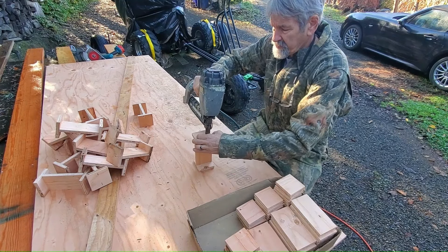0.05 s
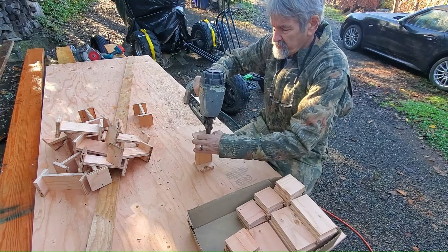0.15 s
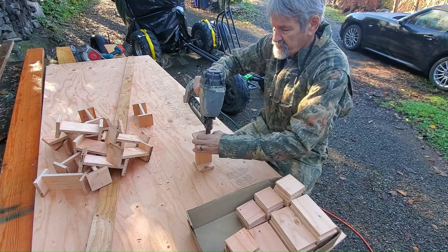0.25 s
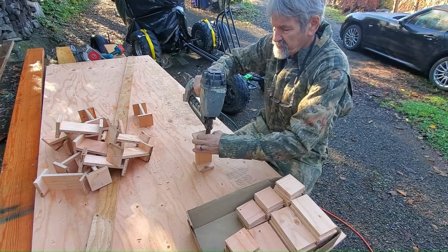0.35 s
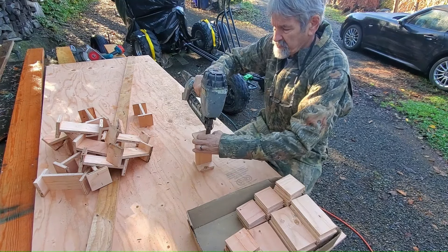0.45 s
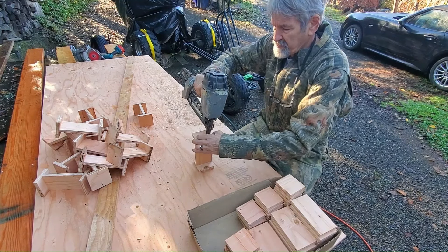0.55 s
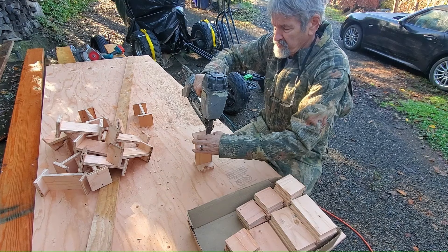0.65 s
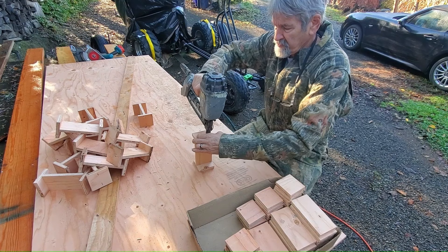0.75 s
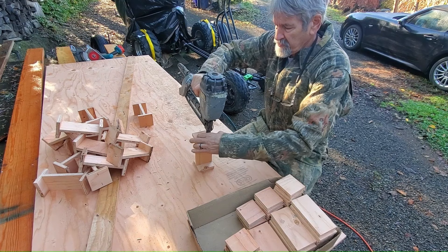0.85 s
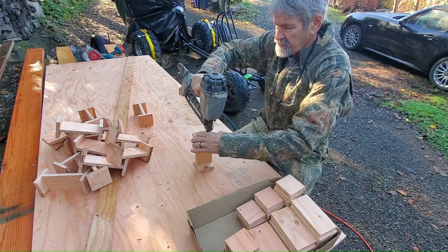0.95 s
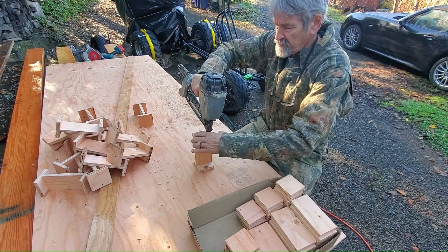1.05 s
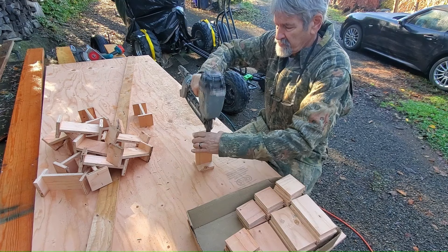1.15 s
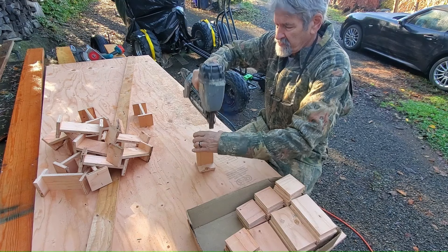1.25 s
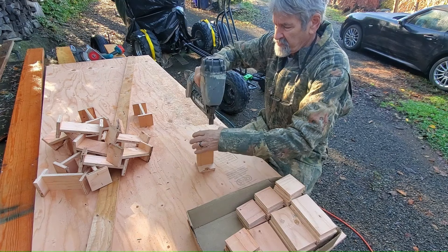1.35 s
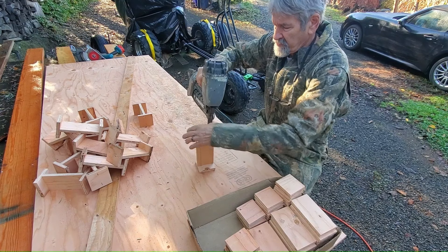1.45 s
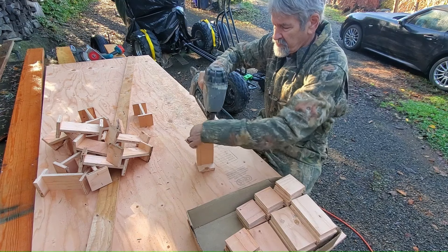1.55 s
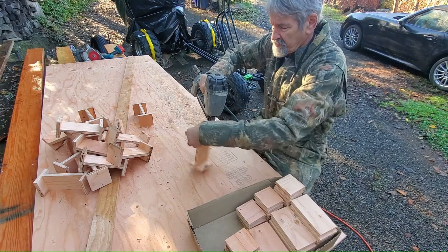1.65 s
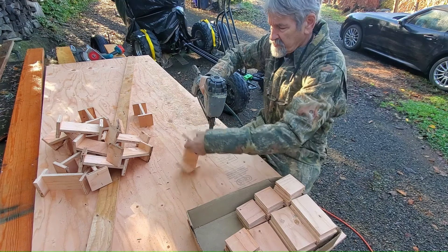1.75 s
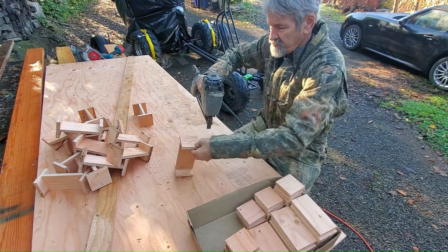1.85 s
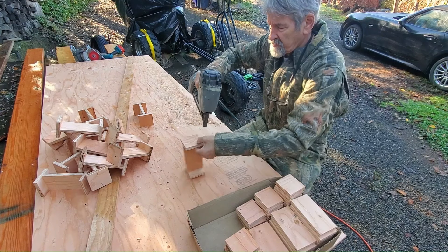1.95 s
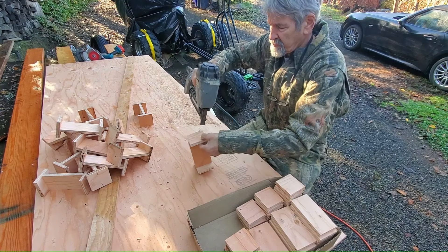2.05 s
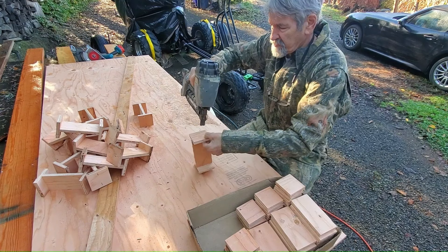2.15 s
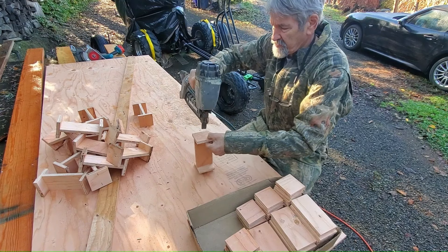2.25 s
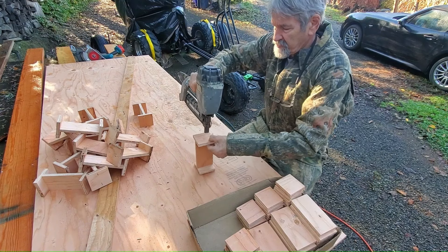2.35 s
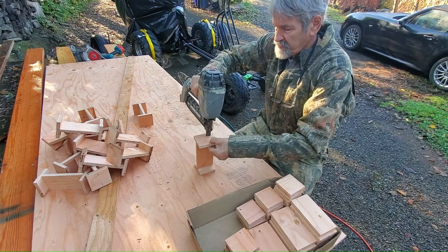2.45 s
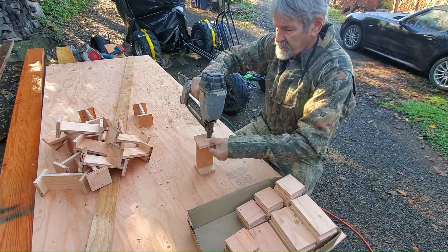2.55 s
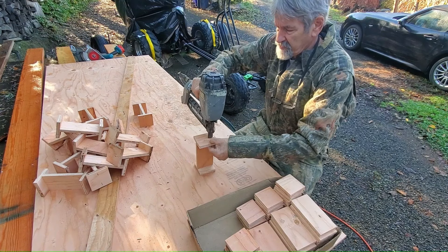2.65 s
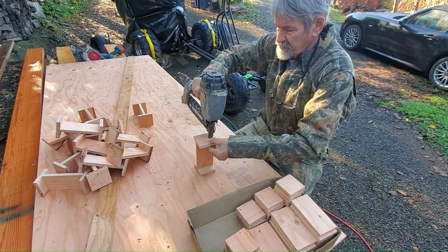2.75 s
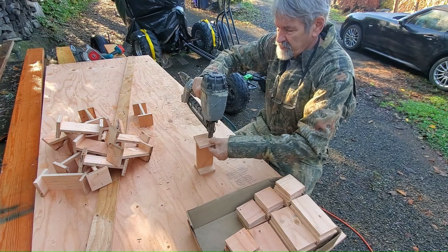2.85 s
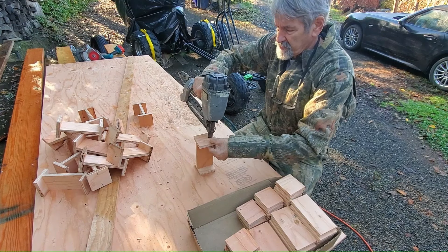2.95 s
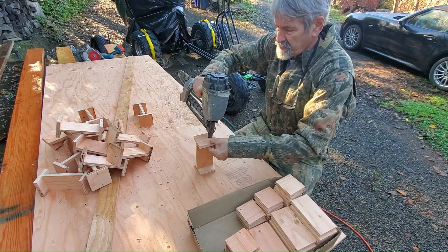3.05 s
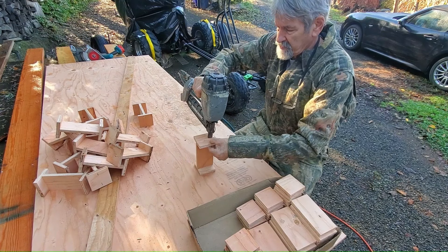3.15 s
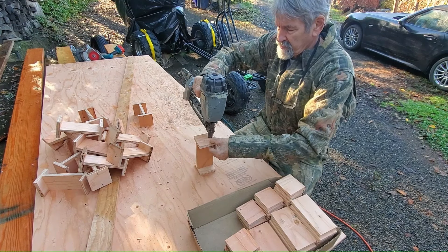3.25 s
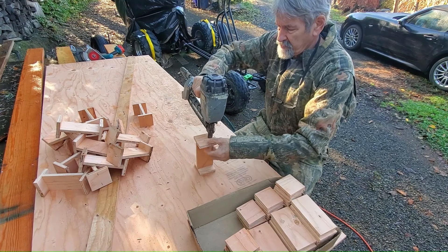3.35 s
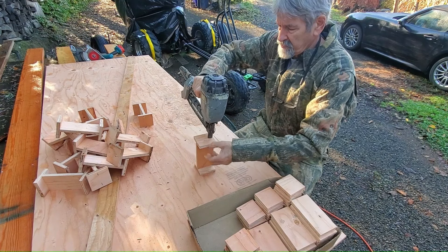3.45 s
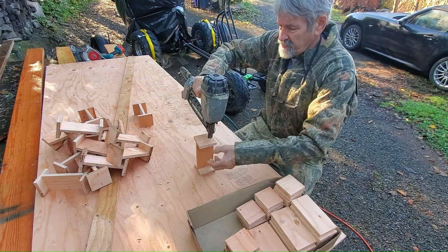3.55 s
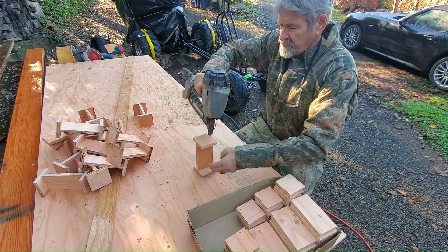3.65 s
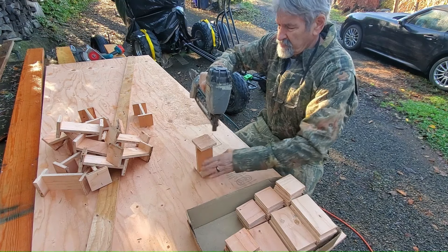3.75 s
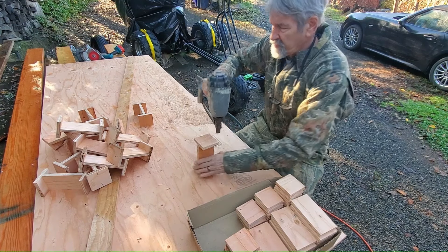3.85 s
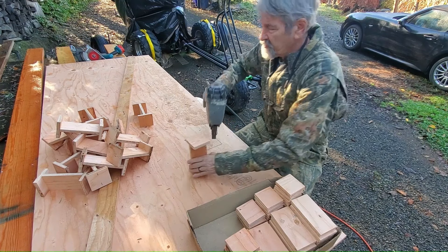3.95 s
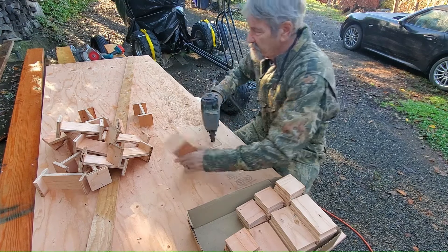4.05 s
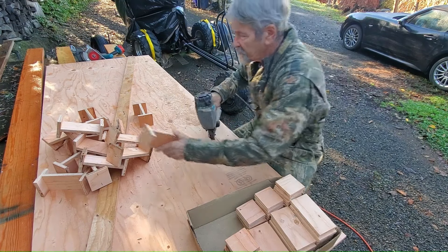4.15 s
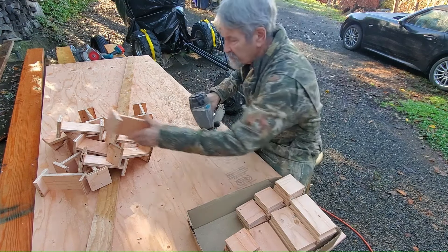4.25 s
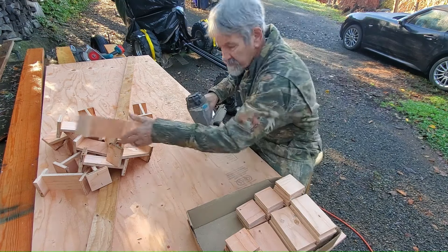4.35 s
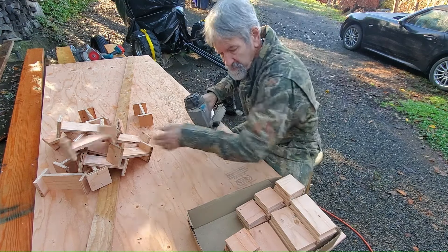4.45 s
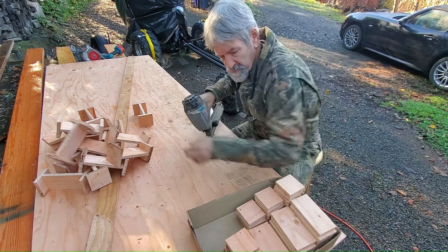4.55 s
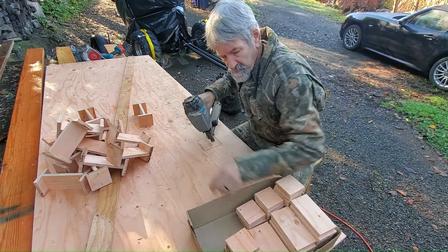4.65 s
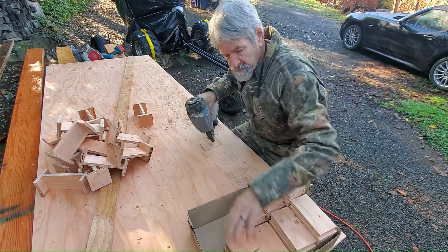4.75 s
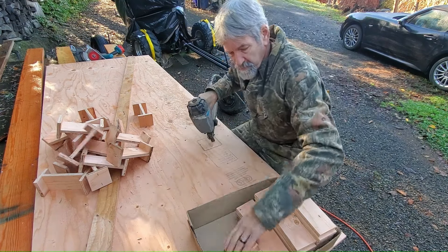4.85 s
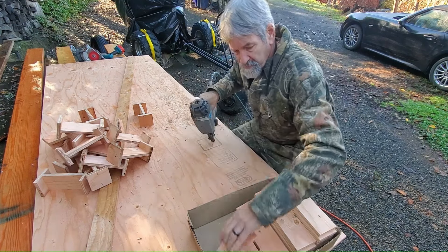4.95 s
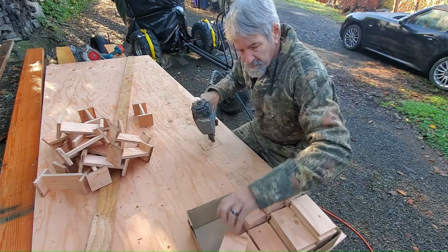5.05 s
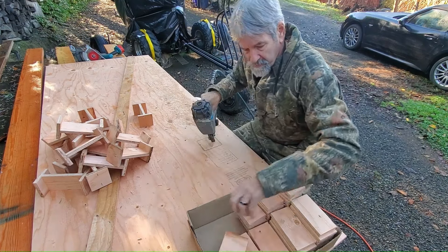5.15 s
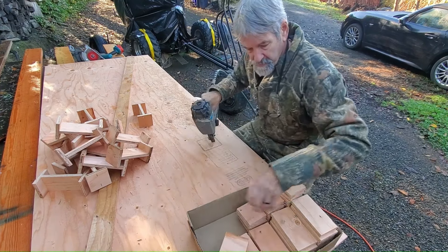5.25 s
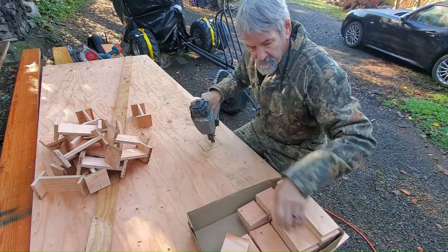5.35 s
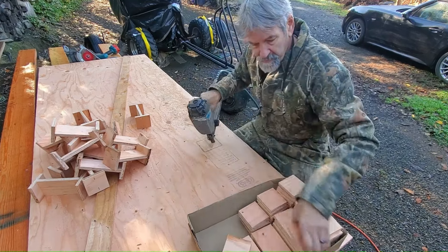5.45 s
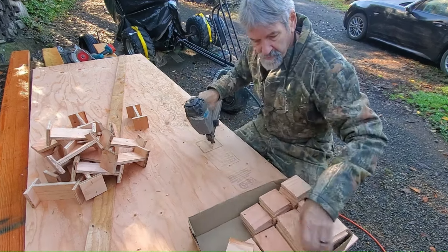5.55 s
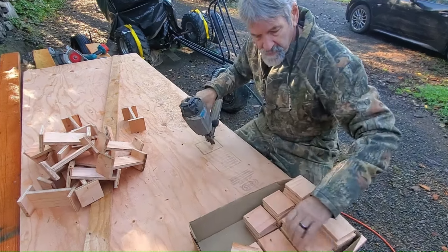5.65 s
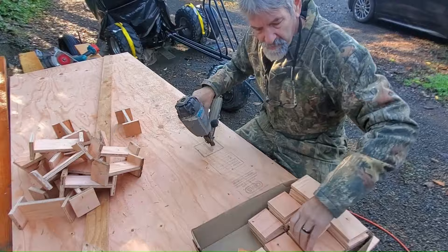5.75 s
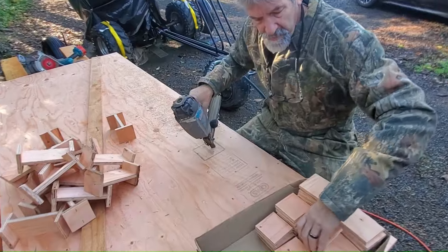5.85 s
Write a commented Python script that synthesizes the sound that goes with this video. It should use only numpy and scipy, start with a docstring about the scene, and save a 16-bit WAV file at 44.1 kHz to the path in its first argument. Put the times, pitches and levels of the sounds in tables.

```python
"""A pneumatic nailer fires twice into a wooden block on a plywood table, outdoors, close to a stereo mic.
Each time air rushes in, the driver strikes, the table booms, the exhaust vents and the yard answers.
The block is turned, set down and tossed on a pile of offcuts to the left; then a sleeve drags over
a box and a block rasps on its cardboard. The hose coupling leaks faintly on the left.
A low, distant rumble sinks after each shot and comes back."""
import sys
import numpy as np
from scipy import signal
from scipy.fft import rfft, irfft, next_fast_len
from scipy.io import wavfile
from scipy.ndimage import uniform_filter1d, map_coordinates

SR = 44100
rng = np.random.default_rng(int(sys.argv[2]) if len(sys.argv) > 2 else 0)


def generate_wav(signal):
    """Clip the signal to [-1, 1] and save it as 16-bit WAV at the path in sys.argv[1]."""
    frames = np.transpose(np.atleast_2d(signal))
    scaled = np.clip(frames, -1, 1) * 32767
    pcm = np.round(scaled).astype(np.int16)
    wavfile.write(sys.argv[1], SR, pcm)


N = 260322
T = np.arange(SR // 2) / SR  # time axis of one short event, s

# how alike the two mic channels are, for three kinds of noise: frequency_hz, correlation
NEAR_IMAGE = [(100, 1), (400, 0.52), (1400, 0.33), (5000, 0.34), (15000, 0.23)]
FAR_IMAGE = [(60, 1), (250, 0.96), (700, 0.074), (1500, 0.0027), (15000, 0.93)]
DIFFUSE_IMAGE = [(100, 1), (400, .5), (1200, 0.3), (15000, 0.6)]
# the plywood sheet flexing as a whole: pitch_hz, level_db, t60_s
SHEET_MODES = [(77, -14.5, 0.16), (87.3, 0.5, 0.22), (123, -7.5, 0.34), (170, -0.5, 0.067),
               (206, -4, 0.068)]
# one row a nail: pull_s, hit_s, release_s, valve_db, burst_db, trail_db, rebound_db, loss_per_bounce_db
NAIL_SHOTS = [(1.2098, 1.2607, 1.338, -13.5, -8, -37, -13, 13.5),
              (3.640, 3.678, 3.797, -13, -8, -29, -19.5, 2)]


def amp(db):
    """Decibels to gain."""
    return 10 ** (np.asarray(db) / 20)


def unit(x):
    """Scale to rms 1."""
    return x / np.sqrt(np.mean(x ** 2) + 1e-20)


def peaked(x):
    """Scale to peak 1."""
    return x / np.abs(x).max()


def along(points, hz):
    """Interpolate (frequency_hz, value) points on a log frequency axis."""
    freqs, values = np.transpose(points)
    return np.interp(np.log(hz + 1), np.log(freqs), values)


def wobble(rate):
    """A smooth random curve, rate knots a second."""
    knots = rng.standard_normal(int(N * rate / SR) + 4)
    return map_coordinates(knots, [np.arange(N) * rate / SR])


def filtered(x, response):
    """Filter x by a gain that is a function of frequency."""
    n = x.shape[-1]
    padded = next_fast_len(n + SR // 10)
    return irfft(rfft(x, padded) * response(np.fft.rfftfreq(padded, 1 / SR)), padded)[..., :n]


def noise(spectrum, image, size=len(T)):
    """Stereo noise of rms 1, coloured by (frequency_hz, level_db) points."""
    def mid_side_gains(hz):
        angle = np.arccos(np.clip(along(image, hz), -1, 1)) / 2
        return amp(along(spectrum, hz)) * [np.cos(angle), np.sin(angle)]
    mid, side = filtered(rng.standard_normal((2, size)), mid_side_gains)
    return unit(np.array([mid + side, mid - side]))


def patchy(x, depth_db):
    """The colour shifts at random, in patches about 500 Hz wide and 60 ms long."""
    bins = signal.stft(x, nperseg=512)[2]
    patches = uniform_filter1d(rng.standard_normal(bins.shape[1:]), size=6, axis=0)
    patches = uniform_filter1d(patches, size=10, axis=1)
    return unit(signal.istft(bins * amp(depth_db * unit(patches)), nperseg=512)[1][:, :N])


def fade(t60, rise):
    """A quick rise and an exponential decay, both in seconds."""
    return amp(-60 * T / t60) * (1 - np.exp(-T / rise))


def swells(strokes):
    """Each stroke rises and falls smoothly about its centre."""
    t = np.arange(N) / SR
    return sum(amp(db) * np.exp(-((t - s) / half) ** 2) for s, db, half in strokes)


def ping(hz, t60):
    """One damped resonance of peak 1."""
    return peaked(fade(t60, rise=0.00023) * np.sin(2 * np.pi * hz * T))


def ring(modes, scatter_db, spread):
    """Damped modes, new in strength at each blow; a wide radiator reaches the channels out of step."""
    out = np.zeros((2, len(T)))
    for k, (hz, db, t60) in enumerate(modes):
        strength, skew = rng.standard_normal(2)
        phase = 2 * np.pi * hz * T + spread * skew * np.array([[1], [-1]])
        out += (-1) ** k * amp(db + scatter_db * strength) * fade(t60, rise=0.0004) * np.sin(phase)
    return out


def add(track, s, sound):
    """Mix a sound in at time s."""
    i = round(s * SR)
    track[:, i:i + sound.shape[-1]] += sound[..., :N - i]


def from_left(x, lead_s):
    """A source to the left reaches that side of the mic first."""
    return filtered(x, lambda hz: np.exp(1j * np.pi * hz * lead_s * np.array([[1], [-1]])))


def leftward(db):
    """Gains that raise the left channel and lower the right."""
    return amp([[db], [-db]])


def hiss():
    """A faint steady hiss under everything."""
    return amp(-89.5) * noise([(100, 0.5), (3000, -9.5), (15000, -7.0)], FAR_IMAGE, size=N)


def dip(sink_stretch=1, return_stretch=1):
    """A gain that sinks after each shot, stays low, then returns."""
    # the dips in level: start_s, sink_time_s, depth_db, return_start_s, return_time_s
    dips = [(1.33, 0.13, 28.5, 2.54, 0.38), (3.83, 0.14, 29, 4.878, 0.003)]
    t = np.arange(N) / SR
    loss_db = 0
    for start_s, sink_s, depth_db, return_start_s, return_s in dips:
        sinking = 1 - np.exp(-np.maximum(t - start_s, 0) / (sink_s * sink_stretch))
        held = np.exp(-np.maximum(t - return_start_s, 0) / (return_s * return_stretch))
        loss_db += depth_db * sinking * held
    return amp(-loss_db)


def background():
    """Outdoor rumble and a distant rush whose colour drifts."""
    # the two spectra: frequency_hz, level_db
    rumble_spectrum = [(13, -39), (22, -14.5), (44, -2.5), (64, 3.5), (151, -6), (183, -14.5), (246, -24.5),
                       (300, -20), (390, -46), (660, -120)]
    rush_spectrum = [(130, -34.5), (200, -6), (250, -8.5), (351, -3.5), (405, -6.5), (480, -2.5), (732, 0),
                     (1200, -8.5), (1700, -19.5), (2200, -30), (3000, -37), (7500, -42), (16000, -44)]
    # likeness of the channels in the open air: frequency_hz, correlation
    wide_image = [(60, 0.93), (150, 1), (380, 0.43), (950, -0.37), (2380, 0.65), (15000, 1)]
    rumble = amp(-45.5 + 1.2 * wobble(14)) * noise(rumble_spectrum, wide_image, size=N)
    rush_gain = amp(-50.5 + 0.28 * wobble(26))
    rush = patchy(noise(rush_spectrum, wide_image, size=N), depth_db=2.0)
    return rumble + rush_gain * rush


def yard(x):
    """The diffuse answer of trees and ground; each frequency dies at its own speed."""
    # the yard's decay: frequency_hz, t60_s
    decay = [(100, 0.63), (600, 0.18), (2000, 0.23), (5000, 0.32), (15000, 0.18)]
    colour = [(150, -28.0), (700, -13.5), (2500, -9.5), (6000, -14), (10000, -11.5), (15000, -13.5)]
    hz, t, bins = signal.stft(rng.standard_normal((2, SR * 3 // 4)), SR, nperseg=256)
    tail = signal.istft(bins * amp(-60 * t / along(decay, hz)[:, None]), SR, nperseg=256)[1]
    tail *= 1 - np.exp(-np.arange(tail.shape[1]) / SR / .05)  # echoes build over 50 ms
    wet = signal.fftconvolve(x, tail / np.linalg.norm(tail[0]), axes=1)[:, :N]
    return filtered(wet, lambda hz: amp(along(colour, hz)))


def whistle(hz):
    """A faint, broken whistle of escaping air."""
    # when it sounds: centre_s, level_db, half_length_s
    whistles = [(.15, -82, .2), (.52, -76, .13), (1.04, -78, .13), (1.476, -51, .011), (3.08, -75, .04),
                (3.18, -79, .035), (3.32, -82, .06)]
    pitch = hz * (1 + .007 * wobble(80))
    return swells(whistles) * amp(2.5 * wobble(45)) * np.sin(2 * np.pi * np.cumsum(pitch) / SR)


def leak():
    """Air hisses from the hose coupling, left of the mic, and now and then whistles."""
    # the leaking air: frequency_hz, level_db
    leak_spectrum = [(1800, -30), (2600, -7), (3200, -9), (3850, -4), (4600, -13), (5300, 0), (6100, -7),
                     (6750, -2), (7400, -22), (16000, -32)]
    air = amp(-75 + wobble(6.1)) * noise(leak_spectrum, DIFFUSE_IMAGE, size=N)
    return leftward(db=3) * (dip(sink_stretch=2, return_stretch=.5) * air + whistle(hz=2635))


def sleeve():
    """Cloth rubs unevenly across the box; dragging on the rim, its hiss narrows and sinks in pitch."""
    # rubbing cloth: frequency_hz, level_db
    cloth_spectrum = [(710, -38), (1200, -6), (2250, -8.5), (2560, -12), (4260, -4), (4650, -8.5),
                      (6370, -10.5), (8000, -17.5), (14700, -18.5), (16000, -27)]
    # strokes over the box and on its rim: centre_s, level_db, half_length_s
    brushes = [(4.92, -62, 0.061), (5.04, -58.5, 0.13), (5.3, -70, 0.079), (5.5, -59, 0.12),
               (5.71, -60, 0.044), (5.86, -61, 0.071)]
    drags = [(5.065, -62, 0.054), (5.2, -66, .1)]
    # centre of the narrow hiss: time_s, pitch_hz
    drag_pitch = [(5.07, 4400), (5.16, 4190), (5.3, 4030)]
    width_hz = 550
    brush_gain = swells(brushes) * amp(1.55 * wobble(67))
    cloth = patchy(noise(cloth_spectrum, DIFFUSE_IMAGE, size=N), depth_db=2.5)
    pitch = np.interp(np.arange(N) / SR, *np.transpose(drag_pitch))
    phase = 2 * np.pi * np.cumsum(pitch) / SR
    band = [wobble(width_hz) * np.sin(phase) + wobble(width_hz) * np.cos(phase) for _ in range(2)]
    return brush_gain * cloth + swells(drags) * amp(1.9 * wobble(40)) * unit(np.array(band))


def rasp():
    """Wood slips on cardboard at a nearly even rate; the slips and the grit between ring the box wall."""
    # the block's strokes: centre_s, level_db, half_length_s
    strokes = [(5.815, -48, 0.02), (5.854, -45.5, 0.022), (5.897, -43.5, 0.022)]
    # resonances of the cardboard: pitch_hz, width_hz, level_db
    wall_modes = [(410, 150, -0.5), (1150, 105, -4.5), (1594, 89, 2.5), (2160, 95, 0.5), (2790, 68, -3),
                  (3780, 54, -10)]
    slip_hz, slip_t60, grit_db = 140, 0.039, 7

    def wall(f):
        return sum((-1) ** k * amp(db) * 1j * f * width / (hz * hz - f * f + 1j * f * width)
                   for k, (hz, width, db) in enumerate(wall_modes))
    slip_count = np.cumsum(slip_hz * amp(0.15 * wobble(60))) / SR
    snaps = np.diff(np.floor(slip_count), prepend=0) * amp(3.4 * wobble(110))
    since_slip_s = (slip_count % 1) / slip_hz
    grit = amp(-60 * since_slip_s / slip_t60) * noise([(300, 0.0049), (6000, 0)], NEAR_IMAGE, size=N)
    return swells(strokes) * unit(filtered(unit(snaps) + amp(grit_db) * unit(grit), wall))


def rubs():
    """Friction catches and slips: a block in the box, the cuff on an edge, the nailer's nose on wood."""
    # strokes of each: centre_s, level_db, half_length_s
    block_slides = [(5.412, -59, .007), (5.44, -57, .016), (5.505, -49.5, 0.031)]
    cuff_skims = [(5.03, -68, 0.13), (5.603, -54.5, 0.026)]
    nose_ticks = [(.332, -65.5, 0.0056), (3.48, -56.5, 0.0037)]
    # spectrum of each: frequency_hz, level_db
    slide_spectrum = [(590, -32), (1000, -3), (2270, -2), (2600, -7), (4160, -9.5), (4560, -18),
                      (6170, -19), (9000, -27), (11700, -54), (19800, -120)]
    skim_spectrum = [(6000, -9), (10000, -9.5), (13500, 0), (16000, -5.5)]
    tick_spectrum = [(1500, -9), (3000, -9), (6500, -1), (9000, -7.5), (15000, -18)]

    def rub(strokes, spectrum, catch_db):
        return swells(strokes) * unit(amp(catch_db * wobble(250)) * noise(spectrum, NEAR_IMAGE, size=N))
    return (rub(block_slides, slide_spectrum, catch_db=2.5)
            + rub(cuff_skims, skim_spectrum, catch_db=0.5)
            + rub(nose_ticks, tick_spectrum, catch_db=-1.0))


def clack(db, corner_hz):
    """A sharp tick and a small block's ring, dulled above corner_hz; the table thumps beneath."""
    # an offcut on the pile: pitch_hz, level_db, t60_s
    offcut_modes = [(381, -4, 0.12), (473, 4.5, 0.042), (580, -0.5, 0.057), (848, -7, 0.059),
                    (891, -15.5, 0.093), (1160, -2.5, 0.057), (1420, 3, 0.04), (1570, -13, 0.088),
                    (1870, -10, 0.077), (2580, -6, 0.033), (2150, -9, .05), (3260, -1.5, 0.025),
                    (3400, -12, 0.044), (6550, -5, 0.032)]
    contact_spectrum = [(200, -1), (600, -1.5), (1500, -11.5), (4000, -20.5), (15000, -21)]
    tick_spectrum = [(500, -6), (1400, -3.0), (3500, -3), (15000, -2.5)]
    body = peaked(ring(offcut_modes, scatter_db=2, spread=.55))
    contact = peaked(noise(contact_spectrum, FAR_IMAGE) * fade(t60=0.16, rise=0.00028))
    tick = peaked(noise(tick_spectrum, FAR_IMAGE) * fade(t60=0.021, rise=0.00022))
    lowpass = signal.butter(2, corner_hz, fs=SR, output='sos')
    dulled = signal.sosfilt(lowpass, body + amp(-2.5) * contact + amp(2) * tick)
    thump = peaked(ring(SHEET_MODES, scatter_db=2, spread=.18))
    return amp(db) * (peaked(dulled) + amp(-11) * thump)


def loose_blocks():
    """Blocks meet edge on with a short ring; the tossed one tumbles to rest."""
    # their contacts: start_s, level_db, corner_hz, edge_re_level_db, edge_pitch_hz
    clacks = [(1.527, -50, 2400, 0.5, 1200), (1.594, -64, 700, -5, 520), (4.1567, -30, 1910, -5, 1600),
              (4.5132, -33, 520, -4.5, 380), (4.587, -35, 383, -7, 589), (4.6023, -20, 1330, -6, 810),
              (4.6122, -36, 600, -4, 470), (4.6205, -22.5, 1880, -3, 560), (4.6367, -36, 1000, -4, 480),
              (4.675, -42, 800, -1, 530), (4.697, -44.5, 700, -5, 480), (4.745, -52, 500, -4.5, 400),
              (4.996, -32, 890, -14, 3950), (5.027, -40, 2000, 4, 1900), (5.688, -38.5, 900, -0.5, 923),
              (5.792, -35.5, 900, -12, 1600)]
    out = np.zeros((2, N))
    for s, db, corner_hz, edge_db, edge_hz in clacks:
        add(out, s, clack(db, corner_hz) + amp(db + edge_db) * ping(edge_hz, t60=0.02))
    return out


def tossed_block():
    """The tossed block grazes the pile and taps it with a corner, ringing in its own modes."""
    # the block's ring: pitch_hz, level_db, t60_s
    block_modes = [(1350, 0, .025), (1572, -14, .08), (3365, -28, .08), (3450, -10, .013),
                   (6600, -24, .012)]
    # grazes on the other pieces: centre_s, level_db, half_length_s
    grazes = [(4.447, -76, 0.017), (4.588, -63, 0.011)]
    tap_s, tap_db = 4.5126, -37.5
    body = peaked(ring(block_modes, scatter_db=1, spread=.55))
    out = swells(grazes) * unit(signal.fftconvolve(rng.standard_normal((2, N)), body, axes=1)[:, :N])
    add(out, tap_s, amp(tap_db) * body)
    return out


def knock(db, thump_db, click_db, t60):
    """One contact flexes the table's sheet, rings its boards and clicks at the point of impact."""
    # shorter waves in the boards: pitch_hz, level_db, t60_s
    board_modes = [(307, -1, 0.055), (336.6, 1.5, 0.19), (421, -4, 0.099), (480, -3.5, 0.076),
                   (590, -1.5, 0.024), (864, -10, 0.054), (1022, -7, 0.083), (1136, -10, 0.037)]
    # the wood's dense ring and the contact click: frequency_hz, level_db
    grain_spectrum = [(120, -27), (280, 7.5), (650, -5.5), (1200, -10), (2000, -22.5), (5000, -62.5)]
    click_spectrum = [(500, -28), (1300, 1), (2200, -4.5), (3400, -8.5), (6000, -13), (15000, -31)]
    grain = peaked(noise(grain_spectrum, NEAR_IMAGE) * fade(t60=0.24, rise=.001))
    boards = peaked(ring(board_modes, scatter_db=2, spread=.35))
    thump = peaked(ring(SHEET_MODES, scatter_db=2, spread=.18))
    click = peaked(noise(click_spectrum, NEAR_IMAGE) * fade(t60=.05, rise=0.00022))
    body = peaked((boards + grain) * amp(-60 * T / t60))
    return amp(db - 4.5) * (body + amp(thump_db + 6.0) * thump + amp(click_db + 3.5) * click)


def handled_block():
    """The hand-held block meets the table with a damped thud, then rocks once onto its other edge."""
    # turning it and setting it down: start_s, level_db, click_db, thud_re_level_db, thud_pitch_hz
    contacts = [(1.701, -64, 1, -8, 201), (1.929, -46.5, -22, 1.5, 267), (2.073, -55, -15, 8.5, 207),
                (2.161, -55, -34, 15, 164), (2.62, -50, -30, 11, 81), (2.743, -47, -20, 15.5, 75.6),
                (3.7719, -26, 3, 10.5, 358), (3.891, -48, -14.5, 13, 378), (3.991, -43.5, -19, -1, 275),
                (4.156, -22.5, -15.5, 3.5, 91.9), (4.178, -27, -17, -3, 333), (4.232, -44.5, -29, 15, 96),
                (5.7, -34.5, -33, 6, 176)]
    hand_t60, rock_s, rock_db = 0.9, 0.035, -11
    out = np.zeros((2, N))
    for s, db, click_db, thud_db, hz in contacts:
        thump_db = 3 + 0.33 * (-47 - db)  # softer contacts are more thump than knock
        thud = amp(db + thud_db) * ping(hz, t60=10.4 / hz)
        add(out, s, knock(db, thump_db, click_db, hand_t60) + thud)
        add(out, s + rock_s, knock(db + rock_db, thump_db, click_db + rock_db, hand_t60))
    return out


def recoil(rebound_s):
    """The nailed block rings and chatters, and is knocked again as the nose drops back and bounces."""
    # block and nose, rung by the driven nail: pitch_hz, level_db, t60_s
    nailed_modes = [(164, -4, 0.12), (348.5, -1, .17), (397, -4.5, 0.11), (467, -7, 0.095),
                    (590, -3, 0.072), (827, -7.5, 0.067), (1050, -10, 0.13), (1150, -3, .05),
                    (1380, -14, 0.2), (3365, -21, .15), (6240, -22.5, .2)]
    ring_lag_s, chatter_lag_s, chatter_gap_s, bounce_gap_s = 0.0054, .004, .0145, .019
    out = np.zeros((2, N))
    for _, hit, release, *_, rebound_db, loss_db in NAIL_SHOTS:
        add(out, hit + ring_lag_s, amp(-17.5) * ring(nailed_modes, scatter_db=1, spread=.35))
        add(out, release + rebound_s, amp(rebound_db - 14) * ping(hz=627, t60=.08))  # the nose rings
        for k in range(3):
            chatter = knock(db=-12 - k, thump_db=-14.5, click_db=-4.5, t60=0.38)
            bounce = knock(rebound_db - k * loss_db, thump_db=-26, click_db=1.5, t60=0.094)
            add(out, hit + chatter_lag_s + k * chatter_gap_s, chatter)
            add(out, release + rebound_s + k * bounce_gap_s, bounce)
    return out


def jet(spectrum, image):
    """Sputtering air hiss with a few narrow, bright peaks."""
    # narrow peaks in the hiss: pitch_hz, added_level_db
    hiss_peaks = [(2073, -6), (3365, -6), (9120, -6), (11650, -5), (12220, -1), (12540, -3.5), (14520, -4),
                  (15170, -4), (15500, -4)]
    half_width_hz, sputter_db = 24, 1.36

    def peak_gain(f):
        return 1 + sum(amp(db) / (1 + ((f - hz) / half_width_hz) ** 2) for hz, db in hiss_peaks)
    return unit(filtered(noise(spectrum, image), peak_gain) * amp(sputter_db * wobble(400)[:len(T)]))


def strike(db, t60):
    """Steel hitting: a short bright crack."""
    # the crack: frequency_hz, level_db
    crack_spectrum = [(350, -31), (600, -4.5), (1230, -11), (1590, -16.5), (2990, 0.5), (4220, -9.5),
                      (6550, -6), (9240, -13), (14500, -8), (16000, -8.5)]
    return amp(db) * fade(t60, rise=0.00016) * noise(crack_spectrum, NEAR_IMAGE)


def nailer(rebound_s):
    """Valve hiss, the driver's double strike, then the cylinder venting and the nose dropping back."""
    # air at the valve, in the exhaust's first burst and in its trailing flow: frequency_hz, level_db
    valve_air = [(240, -51.5), (400, -25.5), (666, -25), (1900, -20.5), (2050, -17.5), (2430, -25),
                 (3370, -9), (4510, -11), (6740, -8), (8500, -15.5), (9320, -7.5), (10900, -9), (11900, -6),
                 (14800, -3.5), (16000, -10)]
    burst_air = [(240, -39), (400, -1.5), (598, -4.5), (1220, -6.5), (2020, -4), (2400, -7), (3470, -4),
                 (4440, -4), (4880, -4), (5270, -4.5), (7750, -9), (10500, -4), (15000, 1), (16000, -3.5)]
    trail_air = [(180, -33.5), (300, -12.5), (614, -10.5), (787, -7.5), (1190, -0.5), (1480, -8),
                 (1610, -8), (1750, -2.5), (5520, -15.5), (6740, 2), (7690, -9), (15200, -4.5),
                 (16000, -15)]
    valve_opens_s, valve_lead_s, valve_t60 = 0.0089, 0.0062, 0.026  # it shuts just ahead of the strike
    bumper_s, pop_s, seat_s = 0.0054, .0015, .0045
    opening = np.clip(T / valve_opens_s, 0, 1) ** 2
    push_time = T / 0.00098
    push = push_time * (2 - push_time) * np.exp(-push_time) * 2  # the table is shoved and springs back
    draining = (1 - np.exp(-T / 0.0053)) / np.sqrt(1 + (T / .072) ** 8)  # the flow holds, then collapses
    out = np.zeros((2, N))
    for pull, hit, release, valve_db, burst_db, trail_db, rebound_db, _ in NAIL_SHOTS:
        closing = amp(-60 * np.maximum(T - (hit - pull - valve_lead_s), 0) / valve_t60)
        add(out, pull, amp(valve_db) * opening * closing * jet(valve_air, NEAR_IMAGE))
        # the driver hits the nail, then the piston hits its bumper
        add(out, hit, strike(db=-13, t60=0.058) + amp(-13) * push)
        add(out, hit + bumper_s, strike(db=-4, t60=0.011) + amp(-9.5) * push)
        # the trigger is released: the exhaust snaps open and vents
        add(out, release, amp(burst_db) * fade(t60=0.125, rise=0.00046) * jet(burst_air, NEAR_IMAGE))
        add(out, release + pop_s, amp(-8) * fade(t60=.014, rise=.0003) * jet(burst_air, NEAR_IMAGE))
        add(out, release, amp(trail_db) * draining * jet(trail_air, FAR_IMAGE))
        # the returning piston jolts the tool and snaps into its seat; the nose drops back
        add(out, release, amp(-21.5) * ping(hz=120, t60=0.036))
        add(out, release + seat_s, strike(db=-15, t60=0.025))
        add(out, release + rebound_s, strike(rebound_db + 1, t60=0.017))
    return out


def scene():
    """From the mic: the work almost straight ahead, the pile to the left, the yard all around."""
    rebound_s = .0245  # from trigger release to the nose dropping back
    low_cut = signal.butter(2, 55, 'highpass', fs=SR, output='sos')  # deep bass thins out below about 55 Hz
    work = nailer(rebound_s) + recoil(rebound_s) + handled_block()
    work = signal.sosfilt(low_cut, from_left(work, lead_s=.000055))
    pile = loose_blocks() + tossed_block()
    pile = leftward(db=1) * signal.sosfilt(low_cut, from_left(pile, lead_s=0.00026))
    handling = sleeve() + rasp() + rubs()
    echoes = yard(work + amp(-11.0) * pile)
    return work + pile + echoes + dip() * (handling + background()) + leak() + hiss()


def record(dry):
    """Peaks round off below full scale; the treble ends steeply at the band limit."""
    ceiling, top_hz = .92, 15900
    rounded = dry / (1 + (dry / ceiling) ** 6) ** (1 / 6)
    return filtered(rounded, lambda hz: 1 / np.sqrt(1 + (hz / top_hz) ** 240))


dry = scene()
out = record(dry)
generate_wav(out)
```